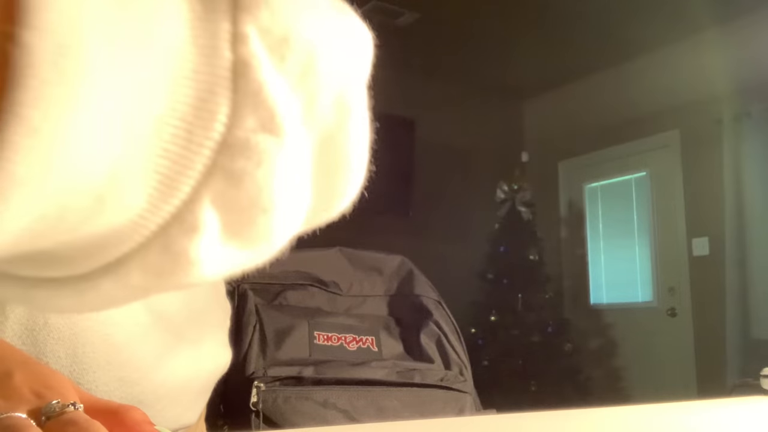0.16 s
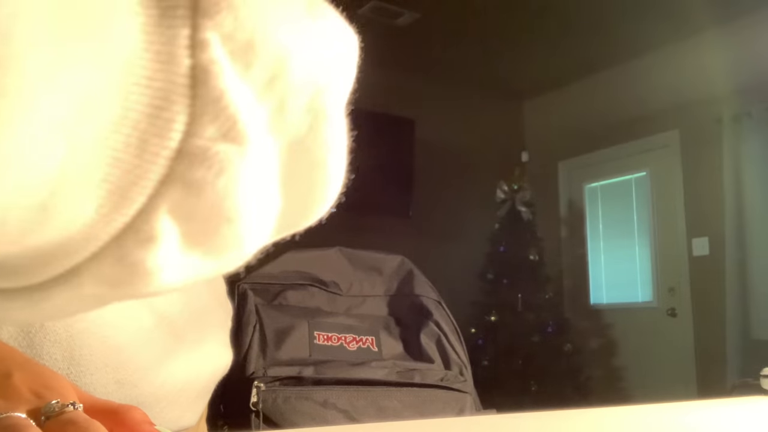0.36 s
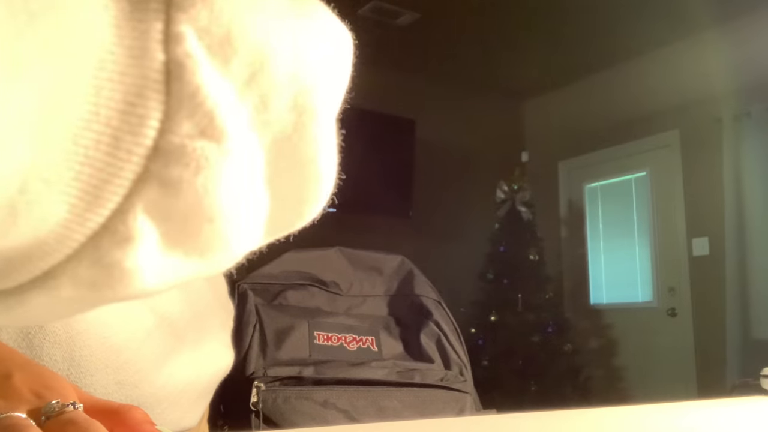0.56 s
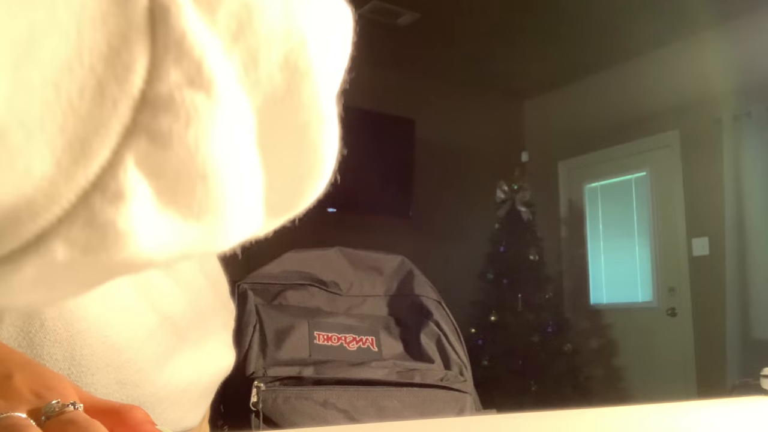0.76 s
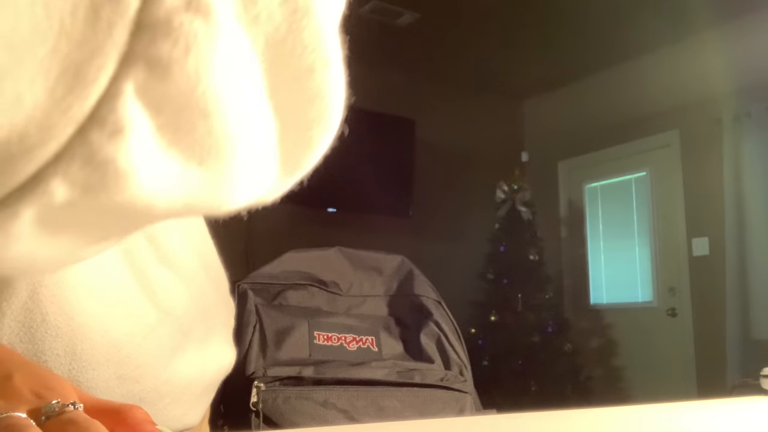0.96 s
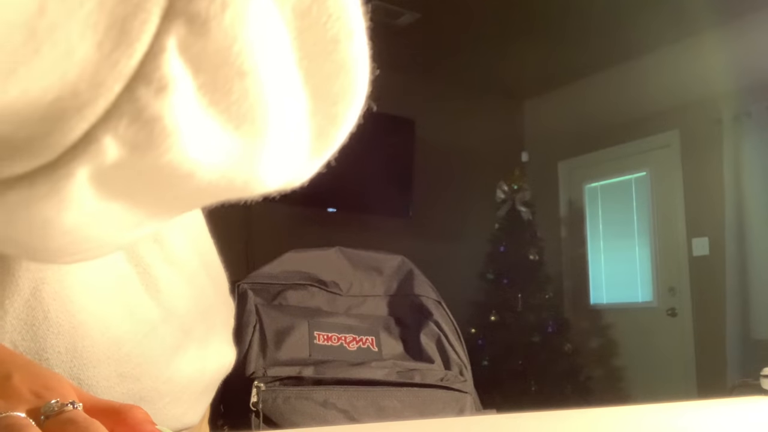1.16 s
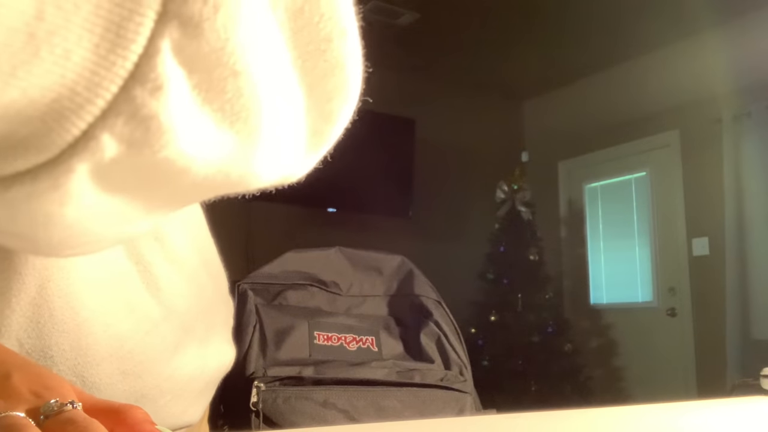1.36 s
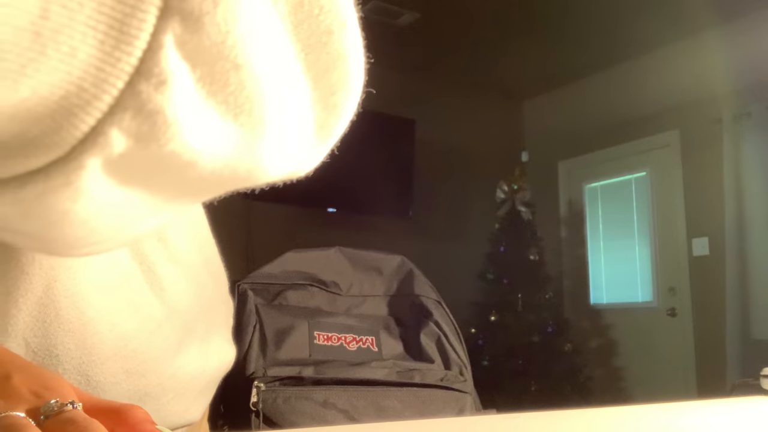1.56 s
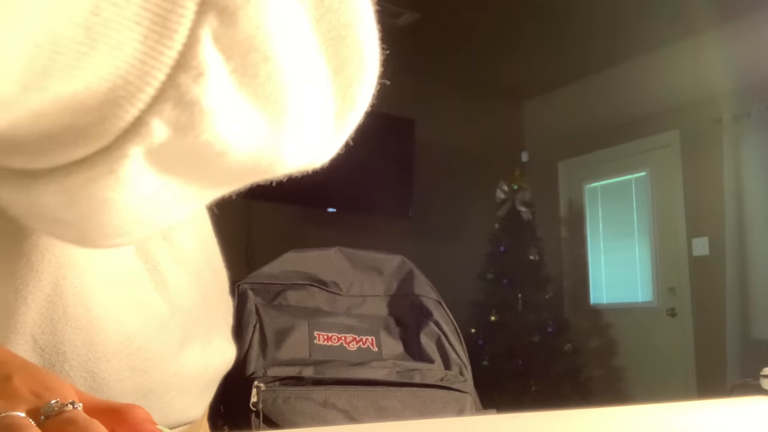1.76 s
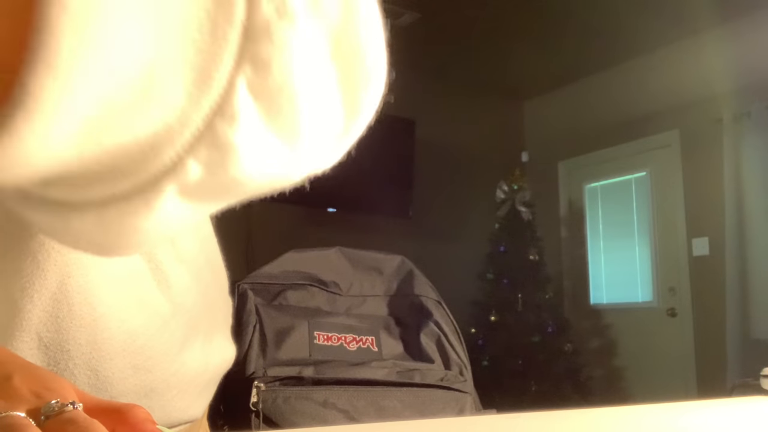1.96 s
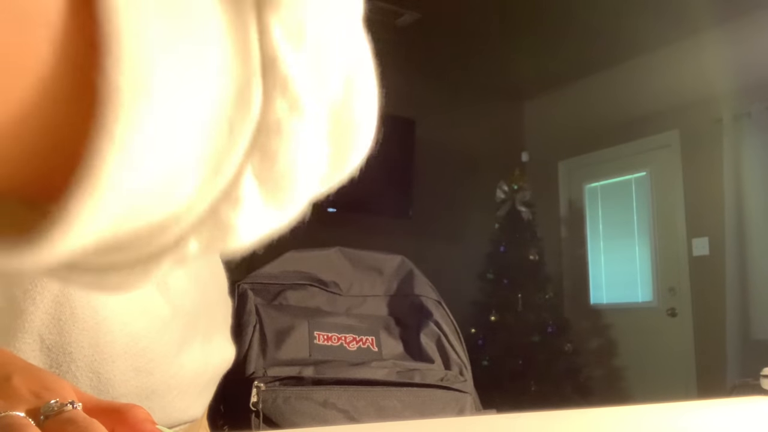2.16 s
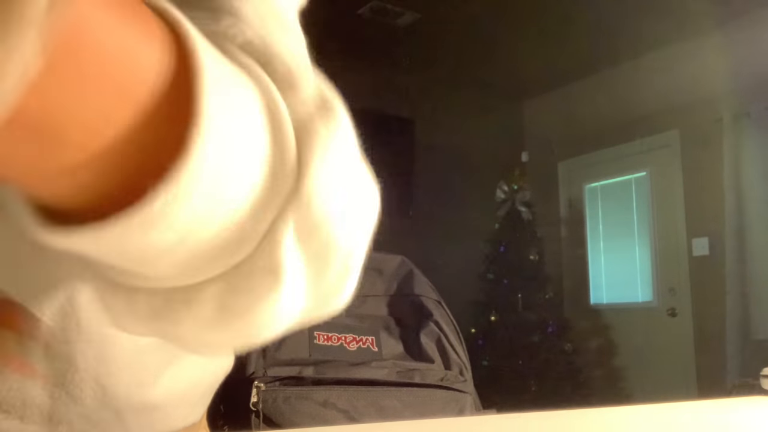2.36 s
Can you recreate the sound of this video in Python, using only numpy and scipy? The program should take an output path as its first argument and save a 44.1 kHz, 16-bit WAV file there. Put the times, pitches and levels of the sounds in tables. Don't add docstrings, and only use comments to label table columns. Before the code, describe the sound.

Jewelry handled on a hollow plastic tray: soft scuffs and small clicks, a few sharp knocks with brief metallic pings, finally a loud rapid clatter that dies away, close stereo pickup, quiet indoor room.

```python
import sys
import numpy as np
from scipy import signal
from scipy.fft import rfft, irfft
from scipy.io import wavfile
from scipy.ndimage import uniform_filter1d

SR = 44100
rng = np.random.default_rng(int(sys.argv[2]) if len(sys.argv) > 2 else 0)


def pcm_store(signal):
    levels = np.round(np.clip(np.atleast_2d(signal), -1, 1) * 32767)
    wavfile.write(sys.argv[1], SR, levels.astype(np.int16).T)


def attenuation_scalar(level_db):
    decades = np.asarray(level_db, float) / 20
    return 10 ** decades


N = 110250

# (time [s], effort [dB], brightness [dB])
SLIDES = [(0.11, -89, -8), (0.135, -37.5, 1), (0.26, -38, -1), (0.33, -53.5, -10), (0.38, -36, -3),
          (0.53, -42, 2), (0.60, -66, -21), (0.75, -43.5, 2), (0.82, -51.5, -7), (0.95, -45, -10),
          (1.12, -42, 0), (1.21, -44, 1.5), (1.29, -52.5, -10.5), (1.50, -48.5, -7.5), (1.63, -56, -1.5),
          (1.78, -46, 5), (2.03, -42.5, -6), (2.38, -61.5, 7.5)]
# (time [s], rim [dB], panel [dB], large beads [dB], small beads [dB])
HARD_KNOCKS = [(0.1716, -43, -30, -51, -42.5), (0.182, -24, -25, -42.5, -34),
               (0.39, -22.5, -23, -25, -22.5), (0.5172, -33, -28.5, -46.5, -42),
               (0.9862, -38, -25.5, -45, -41), (1.0165, -34, -28.5, -46, -30.5),
               (1.2276, -25.5, -18, -23, -25), (1.272, -35.5, -37.5, -55, -35.5),
               (1.3772, -37, -32, -53, -48.5), (1.4104, -88, -48, -60, -55.5),
               (1.459, -30.5, -25, -38, -36.5), (1.4805, -41, -38.5, -48, -42.5),
               (1.7069, -17.5, -22.5, -33, -32.5), (1.8153, -20, -21, -31, -29.5),
               (1.8384, -24, -31.5, -40, -38.5), (1.917, -17.5, -21, -44.5, -34),
               (1.9548, -21, -25, -40, -27.5), (1.9643, -9.5, -16, -24, -26), (1.9795, -6, -10, -18, -11),
               (2.0091, -13, -16.5, -30.5, -24.5), (2.0172, -20.5, -17.5, -31, -19.5),
               (2.0355, -22, -23.5, -42.5, -33)]
# (start [s], base [dB], panel [dB], grit [dB], length [s])
SOFT_SCUFFS = [(0.12, -23, -35, -37.5, 0.023), (0.152, -15, -58, -50, 0.018),
               (0.36, -23.5, -33.5, -42, 0.02), (0.449, -25, -26.5, -33.5, 0.017),
               (0.516, -21, -32, -43, 0.021), (0.648, -30, -38, -48, 0.021),
               (0.658, -24, -28.5, -41, 0.015), (0.716, -24.5, -27.5, -41, 0.027),
               (0.743, -22, -26, -35, 0.011), (0.776, -47, -30.5, -44, 0.018),
               (0.863, -30, -34, -51, 0.015), (0.969, -20.5, -32.5, -40, 0.02),
               (1.238, -19, -28, -26.5, 0.024), (1.727, -12, -43, -32.5, 0.009),
               (1.771, -14.5, -57, -28, 0.019), (1.853, -19, -40.5, -27.5, 0.006),
               (2.240, -43.5, -48, -35, 0.039)]


def evened(x):
    return x / np.sqrt(np.mean(x ** 2) + 1e-20)


def smoothed(x, size):
    return uniform_filter1d(uniform_filter1d(x, size=size), size=size)


def read(points, hz):
    f, value = np.transpose(points)
    return np.interp(np.log(hz + 1), np.log(f + 1), value)


def curve(points, order=1):
    points = np.array(points)
    return np.interp(np.arange(N) / SR, points[:, 0], points[:, order])


def band(x, lo_hz, hi_hz):
    edges_hz = [lo_hz, min(hi_hz, SR / 2 - 1)]
    return signal.sosfilt(signal.butter(3, edges_hz, "band", fs=SR, output="sos"), x)


def contacts(start, shape, db, blow=0):
    length = shape.shape[-1]
    force = rng.standard_normal((len(start), length)) * shape
    force[:, 0] += blow
    at = np.round(start * SR).astype(int)[:, None] + np.arange(length)
    return at, force / np.linalg.norm(force, axis=1, keepdims=True) * attenuation_scalar(db)[:, None]


def summed(at, force):
    return np.bincount(at.ravel(), force.ravel(), N)


def swell(t, length_s):
    return np.sin(np.pi * np.minimum(t / length_s, 1)) ** 2


def drift():
    places_per_s = 14
    steps = rng.standard_normal(100)
    return np.interp(np.arange(N) / SR * places_per_s, np.arange(len(steps)), steps)


def coloured(spectrum, same):
    a, b = rng.standard_normal((2, N))
    pair = np.array([a, same * a + np.sqrt(1 - same ** 2) * b])
    hz = np.fft.rfftfreq(N, 1 / SR)
    gain_db = read(spectrum, hz) - 60 * (hz > spectrum[-1][0])
    return evened(irfft(rfft(pair) * attenuation_scalar(gain_db), N))


def air():
    # (frequency [Hz], density [dB per Hz])
    air_spectrum = [(20, -21), (60, -7), (460, -36), (800, -43.5), (7800, -58.5), (9300, -69),
                    (11500, -52.5), (14600, -56.5)]
    return attenuation_scalar(-56) * coloured(air_spectrum, 0.5)


def rumble():
    # (frequency [Hz], density [dB per Hz])
    rumble_spectrum = [(25, -14.5), (60, -5.5), (92, 8), (150, -10.5), (200, -28.5)]
    # (time [s], gain [dB])
    gate_gain = [
        (0.10, -24),
        (0.14, -0.5),
        (2.35, -0.5),
        (2.5, -9.5),
    ]
    return attenuation_scalar(-51.5 + curve(gate_gain)) * coloured(rumble_spectrum, 1)


def room(x):
    # (frequency [Hz], reverberation time t60 [s])
    room_decay = [(150, 0.2), (1500, 0.48), (5000, 0.5), (8000, 0.18), (11000, 0.58)]
    taps = np.zeros((2, SR // 2))
    at = np.arange(200, SR // 2 - 20, 20)
    at = at + rng.integers(0, 20, (2, len(at)))
    np.put_along_axis(taps, at, rng.choice([-1., 1.], at.shape), 1)
    taps = np.array([taps[0], 0.82 * taps[0] + 0.6 * taps[1]])
    hz, t, z = signal.stft(taps, SR, nperseg=256)
    decay_db = -60 * t / read(room_decay, hz)[:, None]
    tail = signal.istft(z * attenuation_scalar(decay_db), SR, nperseg=256)[1]
    return signal.fftconvolve(x, tail / np.linalg.norm(tail[0]), axes=1)[:, :N]


def clinks():
    # (time [s], peak level [dB], frequency [Hz], decay t60 [s])
    pings = [(.129, -60, 13300, 0.13), (.171, -57, 12000, 0.091), (.171, -59, 10400, 0.078),
             (.390, -39.5, 10400, 0.032), (.402, -63, 12000, 0.022), (.455, -71, 12000, 0.09),
             (.925, -53, 5090, 0.14), (.984, -51, 13320, 0.042), (1.015, -51.5, 9970, 0.042),
             (1.018, -33, 5900, 0.045), (1.227, -45.5, 13250, .1), (1.243, -50, 10550, 0.12),
             (1.271, -53, 12400, .07), (1.272, -55.5, 14100, 0.046), (1.273, -34, 6020, 0.073),
             (1.411, -50, 6070, 0.081), (1.459, -44, 10070, .03), (1.707, -54, 14200, 0.054),
             (1.708, -59, 12740, .06), (1.712, -62, 13500, .1), (1.778, -59, 10700, .06),
             (1.782, -59, 13600, 0.053), (1.787, -53, 8940, 0.034), (1.817, -53, 10650, .04),
             (1.815, -57, 11900, .03), (1.815, -58, 13030, 0.036), (1.851, -62, 13000, 0.044),
             (1.980, -35.5, 13360, 0.12), (1.986, -41.5, 14140, 0.092), (2.009, -45, 10650, 0.13),
             (2.009, -48, 10860, 0.12), (2.021, -47.5, 13200, .12), (2.020, -48, 14150, .08)]
    rise_s, split, pair_db = 0.0014, 0.01, 0.5
    out, t = np.zeros((2, N)), np.arange(8000) / SR
    rattle = 1 + 0.45 * evened(smoothed(rng.standard_normal((len(pings), len(t))), 120))
    phases = rng.uniform(0, 2 * np.pi, (len(pings), 3))
    for (s, db, hz, t60), phase, rough in zip(pings, phases, rattle):
        lead = np.array([[0], [phase[2] / 2]])
        lower = np.sin(2 * np.pi * hz * t + phase[0] + lead)
        upper = np.sin(2 * np.pi * hz * (1 + split) * t + phase[1] - lead)
        envelope = np.minimum(t / rise_s, 1) * attenuation_scalar(db - 60 * t / t60)
        heard = out[:, round(s * SR):][:, :len(t)]
        heard += (lower + attenuation_scalar(pair_db) * upper) * rough * envelope
    return out


def sparks():
    knocks, scuffs = np.array(HARD_KNOCKS), np.array(SOFT_SCUFFS)
    t, out = np.arange(2500) / SR, np.zeros((2, N))
    edge_s, edge_db, splash_s, splash_db = 0.00098, -8, 0.0099, -19.5
    for side in (0, 1):
        edge = contacts(knocks[:, 0], np.exp(-t / edge_s), knocks[:, 4] + edge_db, blow=1)
        splash = contacts(knocks[:, 0], np.exp(-t / splash_s), knocks[:, 4] + splash_db)
        rasp = contacts(scuffs[:, 0], swell(t, scuffs[:, 4:]), scuffs[:, 3])
        out[side] = summed(*edge) + summed(*splash) + summed(*rasp)
    return band(band(out, 8000, 14800), 3000, 10500)


def sliding():
    grains_per_s, spread_db, shiver_db = 3600, 4, 2.5
    size = attenuation_scalar(spread_db * np.minimum(rng.exponential(1, N), 4)) * rng.standard_normal(N)
    size = size * (rng.random(N) < grains_per_s / SR)
    shiver = evened(smoothed(rng.standard_normal(N), 300))
    moving = np.arange(N) / SR < SLIDES[-1][0]
    return evened(size) * attenuation_scalar(shiver_db * shiver + curve(SLIDES)) * moving


def grit(knocks, scuffs, slips):
    t, tick_s = np.arange(1500) / SR, 0.00091
    ticks = contacts(knocks[:, 0], np.exp(-t / tick_s), knocks[:, 4] - 9.5 + 10.5)
    scrapes = contacts(scuffs[:, 0], swell(t, scuffs[:, 4:]), scuffs[:, 3] + 12.5)
    hiss = slips * rng.choice([-1., 1.], N) * attenuation_scalar(-21 + curve(SLIDES, order=2))
    return band(summed(*ticks) + summed(*scrapes) + hiss, 1800, 8200)


def ring(force, hz, t60, left_db, right_db, lead):
    detune, build_s = 0.016, 0.0017
    turn = np.exp(2j * np.pi * np.cumsum(hz * (1 + detune * drift())) / SR)
    slow, fast = np.exp(-np.log(1000) / np.array([t60, build_s]) / SR)
    z = turn * signal.lfilter([1 - fast], [1, -slow - fast, slow * fast], force / turn + 1e-18)
    left = attenuation_scalar(left_db) * (z * np.exp(1j * lead / 2)).imag
    right = attenuation_scalar(right_db) * (z * np.exp(-1j * lead / 2)).imag
    return np.array([left, right])


def tray():
    # (frequency [Hz], t60 [s], left level [dB], right level [dB], left lead [rad])
    base_modes = [(230, 0.028, -7.5, -26.5, 1.6), (280, 0.031, 2, 0.5, 1.74),
                  (380.7, 0.039, -2, -0.5, 1.915), (480, 0.017, -11.5, -13.5, 1.4)]
    panel_modes = [(627, 0.028, 7.5, 6.5, 4), (866.2, 0.03, 5.5, -12, -3), (945, 0.031, 0, -0.5, -2.5),
                   (1003, 0.021, -1.5, -21, -2.5), (1213, 0.035, -7.5, -4, -2),
                   (1392, 0.028, -20, -6.5, -7)]
    rim_modes = [(1730, 0.018, -10, 3, 1.3), (2097, 0.038, 0, -21, 0.84), (2162, 0.035, 3.5, -0.5, 1.08),
                 (2309, 0.042, -26.5, -2, 0.087)]
    large_bead_modes = [(2872, 0.045, -18, -5, 2.1), (3047, 0.018, 1.5, 5, 1.58),
                        (3827, 0.044, -9, -6, -1.88), (4455, 0.029, -16, -19.5, 0.53)]
    small_bead_modes = [(5098, 0.028, 1, -0.5, -2.5), (5146, 0.017, -1.5, -33.5, 3.5),
                        (5453, 0.0084, -1, -14, 11.5), (6206, 0.039, -9, -5, 10.5),
                        (6617, 0.026, -3, -3.5, -0.4), (7410, 0.034, -10.5, -6.5, 4.5),
                        (7808, 0.023, -0.5, -3.5, -2.5)]
    # (start [s], base [dB], panel [dB], grit [dB], length [s])
    further_scuffs = [(0.199, -21, -35, -38, 0.009), (.224, -25, -32.5, -62, 0.014),
                      (0.256, -30, -39, -58, 0.015), (0.347, -45, -37, -49, 0.0091),
                      (0.377, -30, -31, -40.5, 0.0095), (0.406, -34, -41, -43, 0.012),
                      (0.481, -37, -31.5, -40, 0.01), (.500, -31.5, -31.5, -40, 0.012),
                      (.836, -30.5, -37.5, -50, 0.011), (0.907, -34.5, -55, -46, 0.018),
                      (0.94, -29, -45, -43.5, 0.011), (1.106, -38, -37.5, -54, 0.012),
                      (1.155, -47, -36.5, -40, 0.0063), (1.285, -38, -48, -36, 0.014),
                      (1.552, -35.5, -51, -47, 0.015), (1.651, -33.5, -65, -72, 0.0072)]
    # (low edge [Hz], high edge [Hz])
    body_range = [(175, 560), (450, 1500), (1500, 2700), (2500, 4800), (4600, 8100)]
    chatter_s = (0.0076, 0.0045, 0.0029, 0.0028, 0.0024)
    place_db = (2, 2, 2.92, 2.6, 2.3)
    bare_db = (3, 9.2, 13, 4, 9.7)
    wet_db = (-5, -10.5, -18, -9.5, -8)
    knock_db, scuff_db = (3.5, 4, -1.5, 6.5, 3.5), (-1.5, 4.5, -6, -8.5, -10.5)
    slide_db = (3, 0, -16, -19.5, -23)
    chatter, wash_db = 0.095, 18.5
    port_lag = 24

    knocks, scuffs = np.array(HARD_KNOCKS), np.array(SOFT_SCUFFS + further_scuffs)
    t, slips = np.arange(1500) / SR, sliding()
    near, wet = np.zeros((2, 2, N))
    drag_shape = swell(t, scuffs[:, 4:])
    bodies = (base_modes, panel_modes, rim_modes, large_bead_modes, small_bead_modes)
    for k, body in enumerate(bodies):
        blow_db = knocks[:, (2, 2, 1, 3, 4)[k]] + knock_db[k]
        blow_shape = chatter * np.exp(-t / chatter_s[k])
        blow_at, blow = contacts(knocks[:, 0], blow_shape, blow_db, blow=0.99)
        drag_db = scuffs[:, min(k + 1, 3)] + scuff_db[k]
        drag_at, drag = contacts(scuffs[:, 0], drag_shape, drag_db)
        at, force = np.vstack([blow_at, drag_at]), np.vstack([blow, drag])
        place = attenuation_scalar(place_db[k] * rng.standard_normal((len(at), len(body))))
        rub = slips * attenuation_scalar(slide_db[k] - 20.0 + (k > 1) * curve(SLIDES, order=2))
        bare = rub + summed(at, force)
        rung = attenuation_scalar(bare_db[k]) * np.array([bare, np.roll(bare, -port_lag)])
        for j, mode in enumerate(body):
            rubbed = rub * attenuation_scalar(place_db[k] * drift())
            rung += ring(rubbed + summed(at, force * place[:, j:j + 1]), *mode)
        near += band(rung, *body_range[k])
        wet += band(rung + attenuation_scalar(wash_db) * bare, *body_range[k]) * attenuation_scalar(wet_db[k] - 2)
    for side in (0, 1):
        rough = grit(knocks, scuffs, slips)
        near[side] += rough
        wet[side] += rough * attenuation_scalar(wet_db[-1])
    return near, wet


def scene():
    near, wet = tray()
    edge = signal.cheby2(10, 40, 8500 + 500, fs=SR, output="sos")
    dull = signal.sosfilt(edge, near + room(wet))
    return dull + clinks() + sparks() + rumble() + air()


def band_limit(x):
    return signal.sosfilt(signal.butter(12, 15240, fs=SR, output="sos"), x)


def record(dry):
    mix = np.clip(dry, -1, 1)
    return band_limit(mix)


dry = scene()
out = record(dry)
pcm_store(out)
```